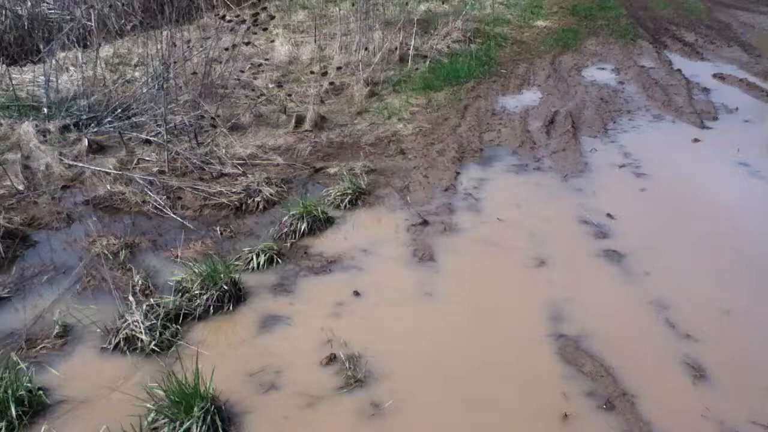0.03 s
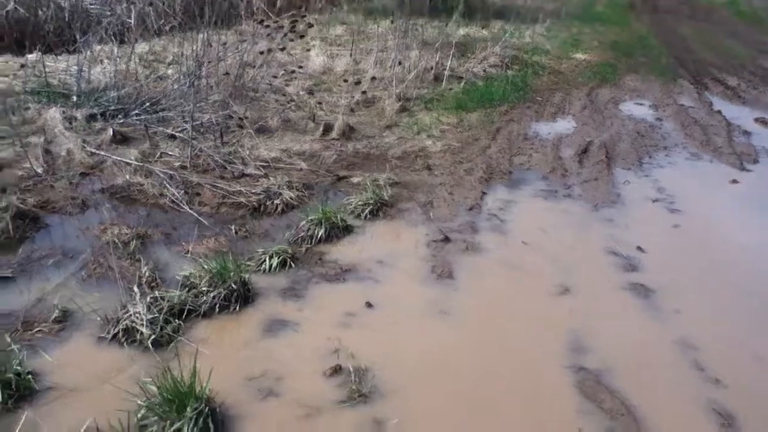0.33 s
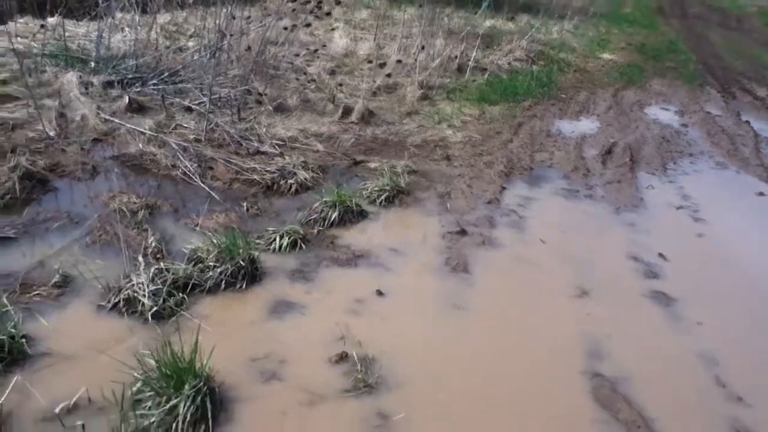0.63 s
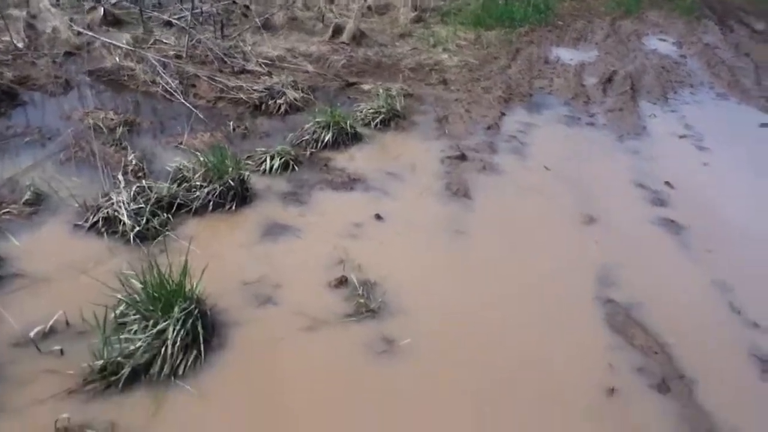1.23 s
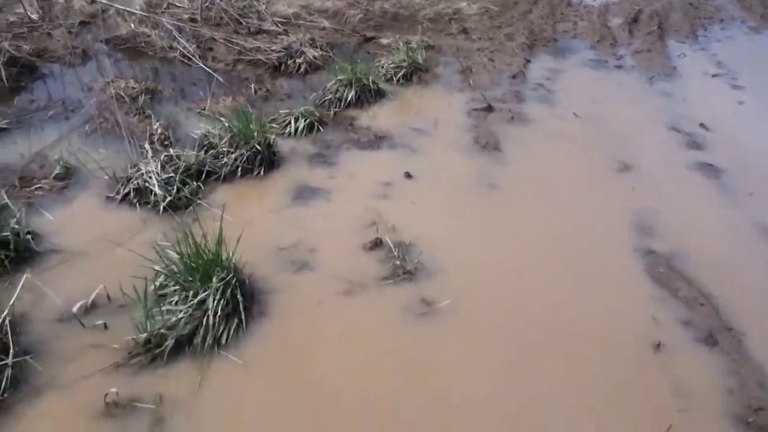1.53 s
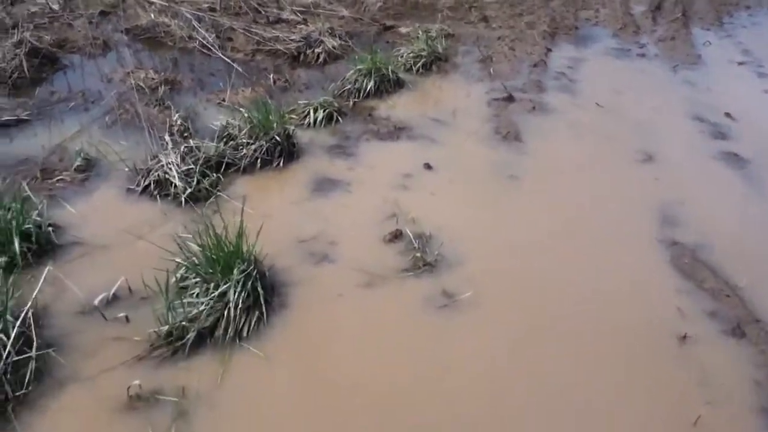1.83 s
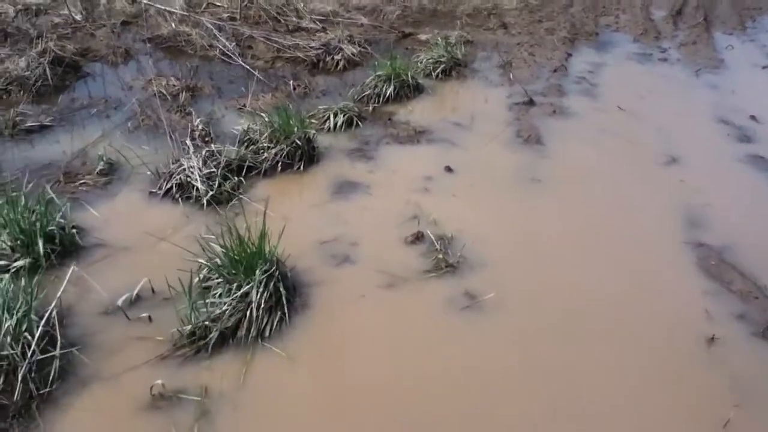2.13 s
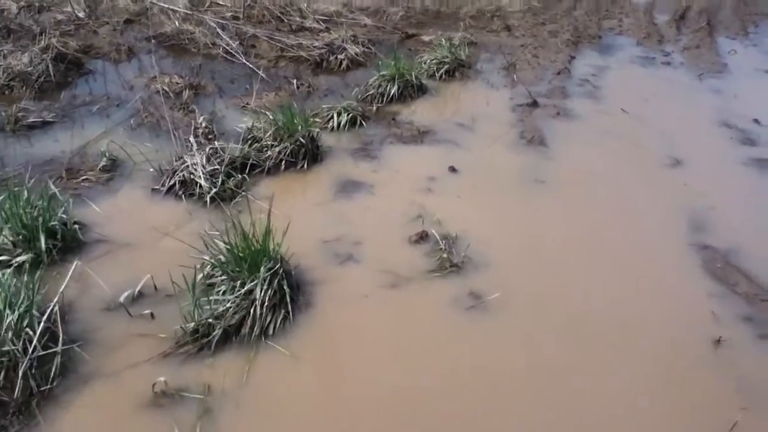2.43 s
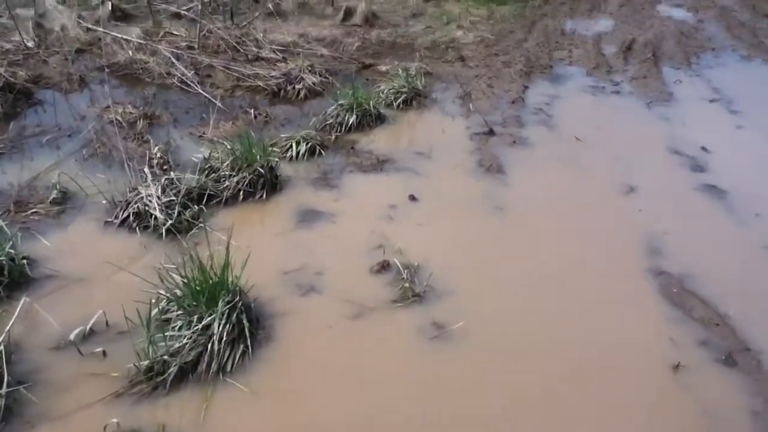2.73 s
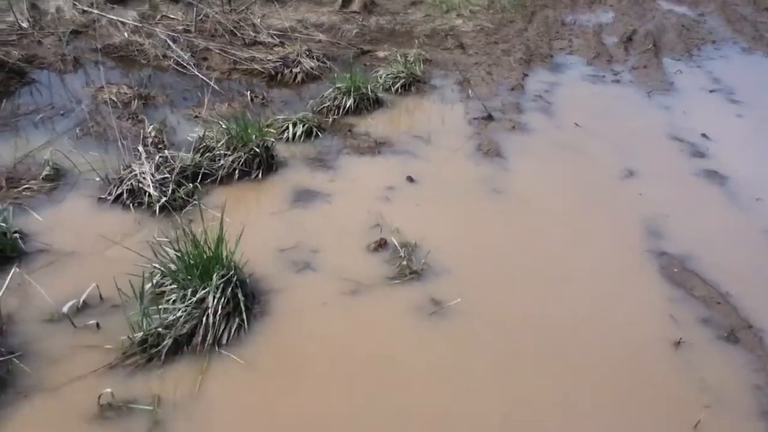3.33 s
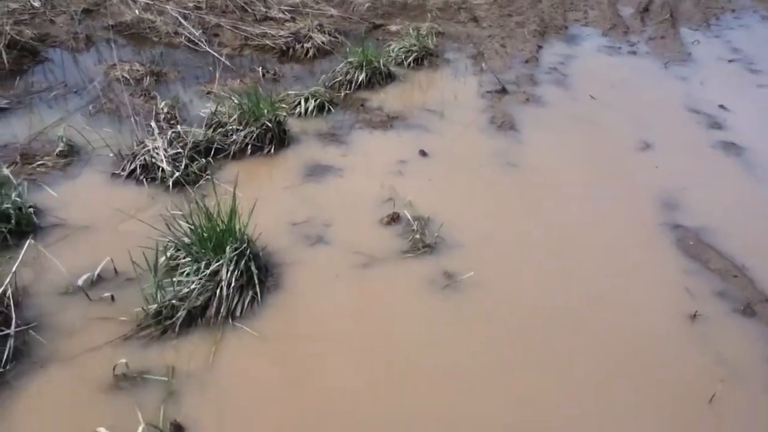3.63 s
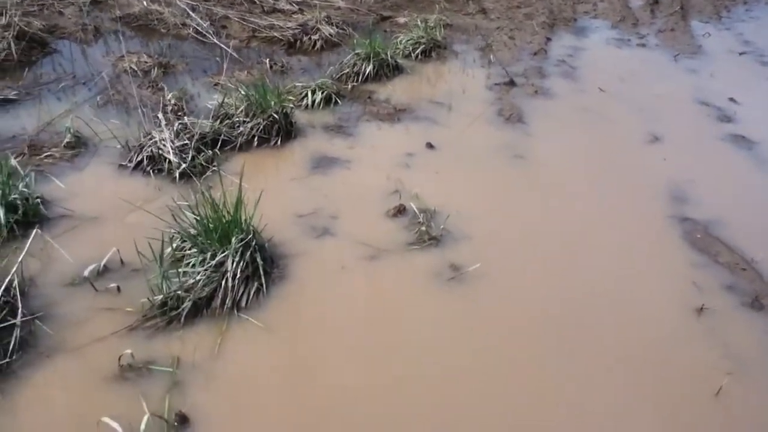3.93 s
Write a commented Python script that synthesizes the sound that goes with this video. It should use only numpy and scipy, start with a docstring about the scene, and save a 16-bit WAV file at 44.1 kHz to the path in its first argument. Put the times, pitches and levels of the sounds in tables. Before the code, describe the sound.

A toad's trill is the main sound, arriving after a quiet outdoor stretch of soft wind buffeting the microphone, distant rumble and faint birds. It grows louder and rises slightly in pitch, with a few tiny ticks in the grass.

```python
"""Light wind bumps a hand-held microphone over a distant rumble and roar, by a muddy puddle
in open country. Far birds whistle and chirp. Near the end a toad starts its trill: rapid
rounded pulses that swell and slow slightly, lengthening and rising in pitch as its vocal
sac fills. A few small ticks come from the grass."""
import sys
import numpy as np
from scipy import signal
from scipy.fft import rfft, irfft
from scipy.io import wavfile

SR = 44100
rng = np.random.default_rng(int(sys.argv[2]) if len(sys.argv) > 2 else 0)


def materialize(psi):
    """Save the field psi as 16-bit PCM at rate SR to the path in sys.argv[1].

    A 1-D psi becomes a single channel; in a 2-D psi each row is a channel.
    """
    bounded = np.clip(np.atleast_2d(psi).T, -1, 1)
    quanta = np.round(bounded * 32767).astype(np.int16)
    wavfile.write(sys.argv[1], SR, quanta)


N = 176400
T = np.arange(N) / SR


def amp(db):
    """Decibels to gain."""
    return 10 ** (np.asarray(db) / 20)


def unit(x):
    """Scales to rms 1."""
    return x / np.sqrt(np.mean(x ** 2) + 1e-20)


def curve(points, s):
    """Reads a curve at the given times."""
    return np.interp(s, *np.transpose(points))


def add(mix, start, sound):
    """Mixes a sound in at a time in seconds."""
    part = mix[max(round(start * SR), 0):][:len(sound)]
    part += sound[:len(part)]


def noise(spectrum):
    """Noise of rms 1 with a given spectrum."""
    hz, db = np.transpose(spectrum)
    gain = amp(np.interp(np.log(np.fft.rfftfreq(N, 1 / SR) + 1), np.log(hz), db))
    return unit(irfft(rfft(rng.standard_normal(N)) * gain, N))


def drift(rate_hz):
    """Random wandering of rms 1."""
    lowpass = np.exp(-(np.fft.rfftfreq(N, 1 / SR) / rate_hz) ** 2)
    return unit(irfft(rfft(rng.standard_normal(N)) * lowpass, N))


def arch(u):
    """Half a sine over 0..1, zero outside."""
    return np.maximum(np.sin(np.pi * np.clip(u, 0, 1)), 0)


def blip(centre, width, db, hz):
    """A short rounded push of a cycle or a few."""
    t = T - centre
    return amp(db) * np.exp(-(t / width) ** 2) * np.cos(2 * np.pi * hz * t)


def resonate(x, hz, width_hz):
    """A steep resonance of gain 1 at its centre."""
    r = np.exp(-np.pi * width_hz / SR)
    pole = r * np.exp(2j * np.pi * hz / SR)
    return 2 * signal.lfilter([(1 - r) ** 2], [1, -2 * pole, pole ** 2], x).real


def echo(x, t60_s):
    """Diffuse outdoor reflections that die away, at the same rms as their source."""
    t = T[:SR]
    tail = rng.standard_normal(SR) * amp(-60 * t / t60_s) * (t > .003)
    return np.std(x) * unit(signal.fftconvolve(x, tail)[:N])


# Rumble from far across the country. Each row: time in seconds, level in dB.
RUMBLE_LEVEL = [(.12, -54), (1.2, -53.5), (1.7, -53), (2.0, -47), (2.25, -50), (2.45, -54), (3.2, -53.5),
                (4, -52)]
# Spectra of the background. Each row: frequency in Hz, relative level in dB.
RUMBLE_SPECTRUM = [(30, -35), (70, -13), (110, -3), (155, 1.5), (195, -1.5), (240, -1), (300, -11),
                   (420, -24), (1000, -61)]
ROAR_SPECTRUM = [(100, -13), (300, -4), (480, -6.5), (700, -3.5), (950, -0.5), (1250, -3.5), (1600, -8.5),
                 (2000, -13.5), (2600, -16), (3600, -25), (8000, -40)]
HISS_SPECTRUM = [(100, -12.5), (3000, 0), (5000, -.5), (8000, -1), (11000, -3), (14000, -6), (16000, -6.5)]


def open_country():
    """A distant rumble swells midway, under a barely wavering roar and a steady hiss."""
    rumble = amp(curve(RUMBLE_LEVEL, T)) * noise(RUMBLE_SPECTRUM)
    roar = amp(-53 + .5 * drift(rate_hz=8.1)) * noise(ROAR_SPECTRUM)
    hiss = amp(-61) * noise(HISS_SPECTRUM)
    return rumble + roar + hiss


# Gusts at the microphone. Each row: time in seconds, relative level in dB.
GUSTS = [(.12, -59), (.25, -57), (.33, -50.5), (.42, -62.5), (.52, -55), (.64, -55), (.73, -44.5),
         (.85, -55.5), (.98, -67), (1.09, -52.5), (1.3, -67), (1.42, -53.5), (1.62, -63), (1.75, -59),
         (1.9, -62), (3.1, -65.5), (3.19, -55), (3.27, -63), (4.0, -63)]
# Their buffeting. Each row: frequency in Hz, relative level in dB.
WIND_SPECTRUM = [(10, -13), (25, -4.5), (45, -7), (70, 6.5), (100, 3.5), (150, -11.5), (300, -39),
                 (1000, -59)]
# Bumps right on the microphone. Each row: centre and width in seconds, level in dB, pitch in Hz.
WIND_BUMPS = [(0.18, 0.0079, -29.5, 107), (.565, 0.0074, -40.5, 89), (.635, 0.0071, -36.5, 90),
              (.708, 0.0058, -39, 100), (.882, 0.0053, -36.5, 90), (1.081, 0.0058, -43, 111),
              (1.41, 0.013, -39, 114)]


def wind():
    """Air buffets the microphone: low noise that follows the gusts, with a few distinct bumps."""
    buffeting = amp(1.5 + curve(GUSTS, T)) * noise(WIND_SPECTRUM)
    return buffeting + sum(blip(*bump) for bump in WIND_BUMPS)


# Birds far from the microphone. Each row: start and length in seconds, level in dB,
# pitch in Hz, opening drop onto that pitch in Hz (negative rises).
BIRD_NOTES = [(0.518, .06, -54.5, 2585, -2), (0.563, 0.046, -50.5, 2716, 6), (0.629, 0.09, -50, 2688, 2),
              (1.155, 0.032, -57, 3130, 300), (1.241, 0.037, -60.5, 3040, 198),
              (1.785, .06, -59.5, 3100, -150), (1.952, 0.028, -61.5, 2540, 443), (2.36, .055, -65, 2300, 4),
              (2.432, 0.066, -56, 2870, 389), (3.04, 0.037, -64, 2870, 265)]


def birds():
    """Far notes slide onto their pitch, the chirps rougher than the whistles, with a faint echo."""
    slide_s = .0131
    song, waver = np.zeros(N), drift(rate_hz=200)
    for start, length, db, hz, drop in BIRD_NOTES:
        t = np.arange(0, length, 1 / SR)
        wobble_hz = (.0044 * hz + .12 * abs(drop)) * waver[round(start * SR):][:len(t)]
        pitch = hz + drop * np.exp(-t / slide_s) + wobble_hz
        phase = 2 * np.pi * np.cumsum(pitch) / SR
        add(song, start, amp(db) * arch(t / length) * np.sin(phase))
    return song + amp(-10) * echo(song, t60_s=.53)


# The effort of the toad at the puddle. Each row: time in seconds, pulse peak in dB.
TOAD_EFFORT = [(3.2, -44), (3.225, -40), (3.3, -37), (3.35, -34.5), (3.43, -33), (3.5, -30.5), (3.72, -29),
               (4.0, -27.5)]
# The rasp in its voice. Each row: frequency in Hz, relative level in dB.
RASP_SPECTRUM = [(400, -17), (900, 2.5), (1400, 5), (2000, 7), (2600, -0.5), (3500, -2), (4300, -13),
                 (4900, -10.5), (9000, -16.5), (16000, -43)]


def toad():
    """Each pulse snaps open and drives the vocal sac for a few cycles that sag in pitch."""
    start_s, period_s, slowing_s_per_pulse = 3.2056, .01388, .000044
    inflate_s, sag_hz_per_s, full_effort_db = .62, 19000, -26
    snap_s, snap_hz, overtone_fade_s = .0021, 4000, .0075
    voice, rasp_envelope, t = np.zeros(N), np.zeros(N), T[:SR // 50]
    for k in range(56):
        level_jitter, pitch_jitter, snap_jitter, time_jitter = rng.standard_normal(4)
        when = start_s + k * period_s + slowing_s_per_pulse * k ** 2 / 2
        db = curve(TOAD_EFFORT, when) + .4 * level_jitter

        # As the sac fills, the pulses lengthen and the pitch climbs.
        fill = 1 - np.exp(-(when - start_s) / inflate_s)
        length = np.interp(fill, [0, 1], [.0026, .0087])
        sac_hz = np.interp(fill, [0, 1], [1466, 1530]) * (1 + .0082 * pitch_jitter)
        overtone_hz = np.interp(fill, [0, 1], [2700, 3040])
        rise_s = .42 * length
        envelope = amp(db) * arch(np.interp(t, [0, rise_s, length], [0, .5, 1])) ** 1.2
        phase = 2 * np.pi * np.cumsum(sac_hz - sag_hz_per_s * (t - rise_s)) / SR

        # Snap and overtone grow more slowly than the pulse.
        push = amp(full_effort_db + .84 * (db - full_effort_db))
        snap_envelope = push * amp(snap_jitter) * arch(t / snap_s) ** 2
        snap = snap_envelope * np.sin(2 * np.pi * snap_hz * t)
        overtone_envelope = push * np.sqrt(arch(t / (1.56 * length))) * np.exp(-t / overtone_fade_s)
        overtone = overtone_envelope * np.sin(2 * np.pi * overtone_hz * t)

        # The third harmonic excites a thin ring that opens up with the sac.
        third = envelope * np.sin(3 * phase)
        ring = min(fill / .41, 1) * resonate(third, hz=4235, width_hz=147)

        pulse = envelope * np.sin(phase) + amp(-21) * snap + amp(-18) * overtone + amp(-10) * ring
        add(voice, when - rise_s + .00005 * time_jitter, pulse)
        add(rasp_envelope, when - rise_s, .45 * snap_envelope + .79 * envelope)
    voice += amp(-19) * rasp_envelope * noise(RASP_SPECTRUM)
    bank_echo = amp(-19) * echo(voice, t60_s=.04)
    field_echo = amp(-19.5) * echo(voice, t60_s=.4)
    return voice + bank_echo + field_echo


# Ticks in the grass. Each row: centre in seconds, level in dB, pitch in Hz, width in seconds.
GRASS_TICKS = [(3.448, -43, 4900, 0.00056), (3.71, -47, 7700, .0003), (3.805, -48, 7500, .0003),
               (3.858, -48, 7600, 0.00032), (3.933, -48, 7200, .0002)]


def grass():
    """Stray high ticks, each only a few cycles long."""
    return sum(blip(centre, width, db, hz) for centre, db, hz, width in GRASS_TICKS)


def scene():
    """Everything at one microphone by the puddle."""
    return (open_country() + wind() + birds() + toad() + grass())[None]


def record(dry):
    """The microphone opens after a moment of silence; the highest treble is cut steeply."""
    opens_s, cutoff_hz = .12, 15850
    lowpass = signal.firwin(601, cutoff_hz, window=("kaiser", 9), fs=SR)
    return signal.oaconvolve(dry * (T >= opens_s), lowpass[None], "same")


dry = scene()
out = record(dry)
materialize(out)
```